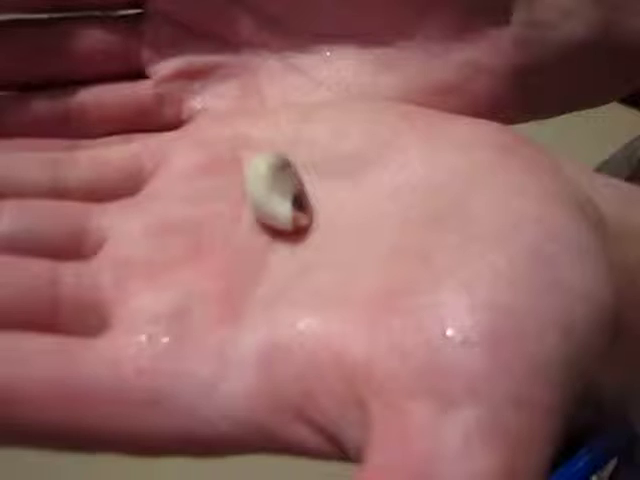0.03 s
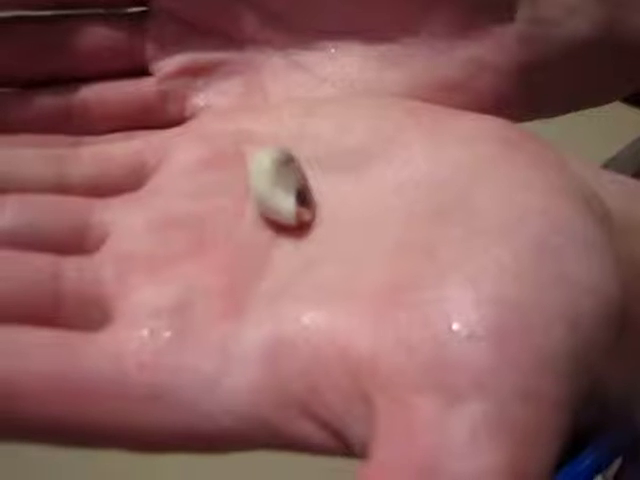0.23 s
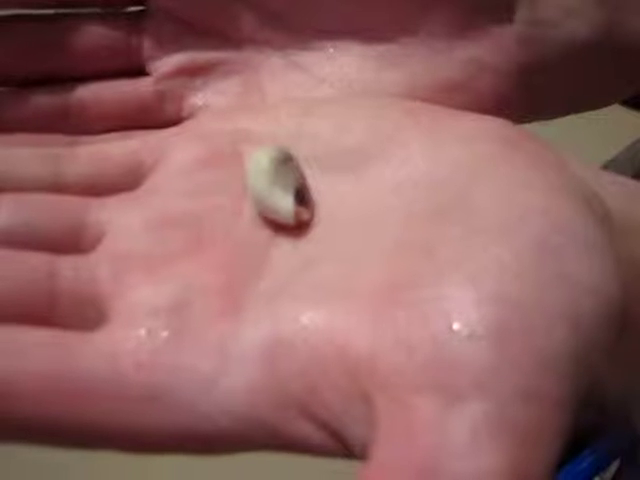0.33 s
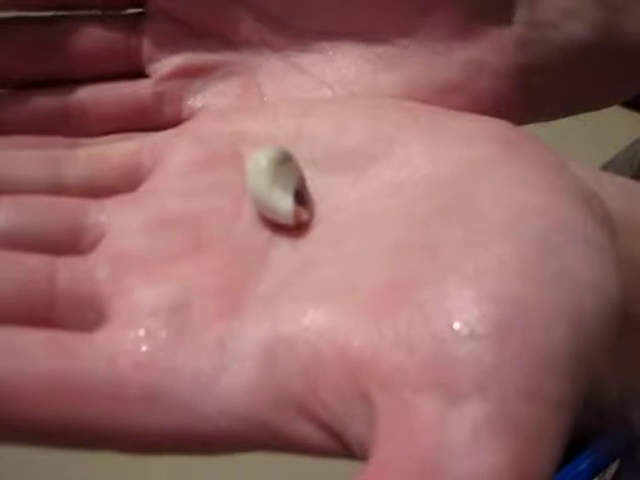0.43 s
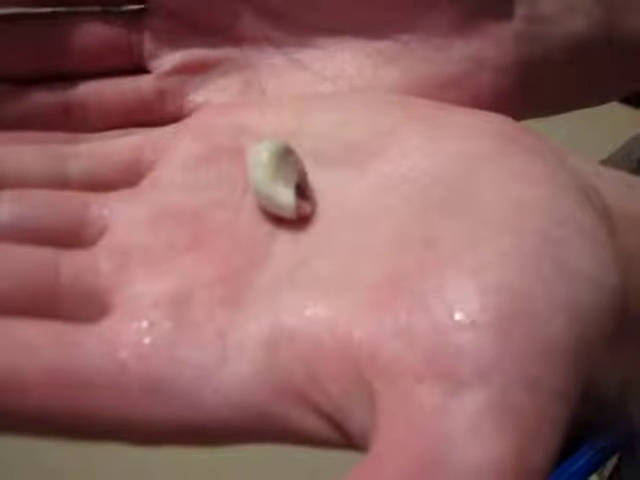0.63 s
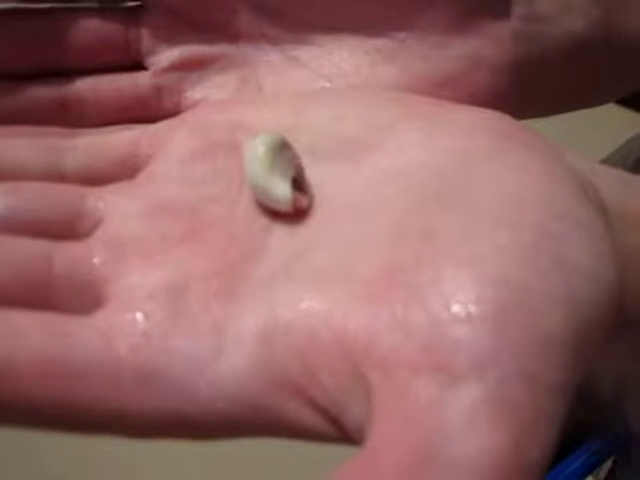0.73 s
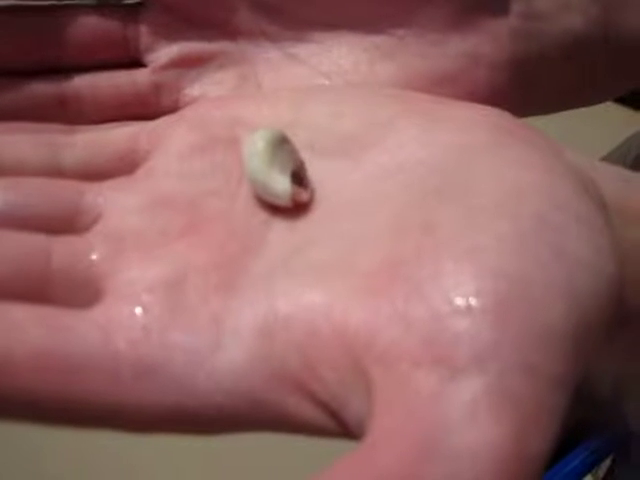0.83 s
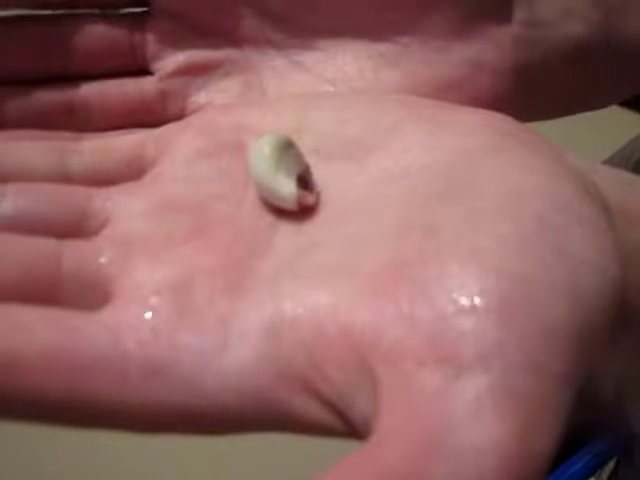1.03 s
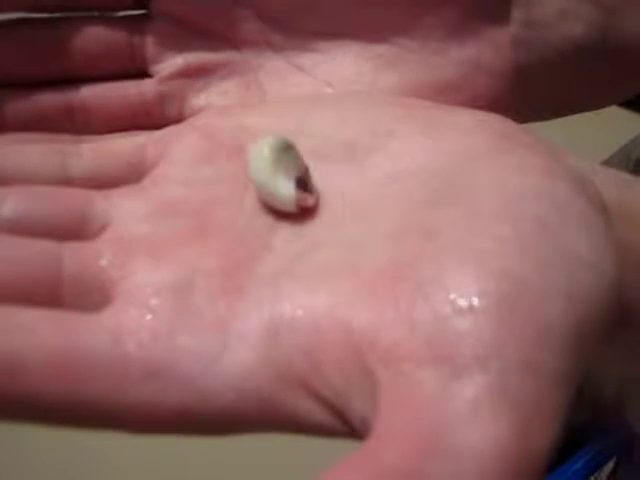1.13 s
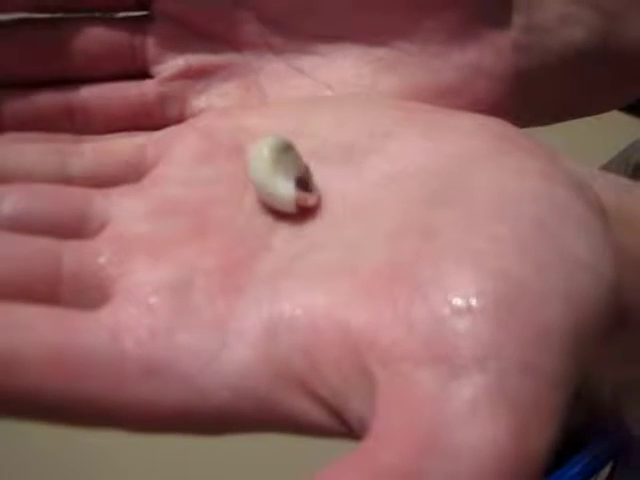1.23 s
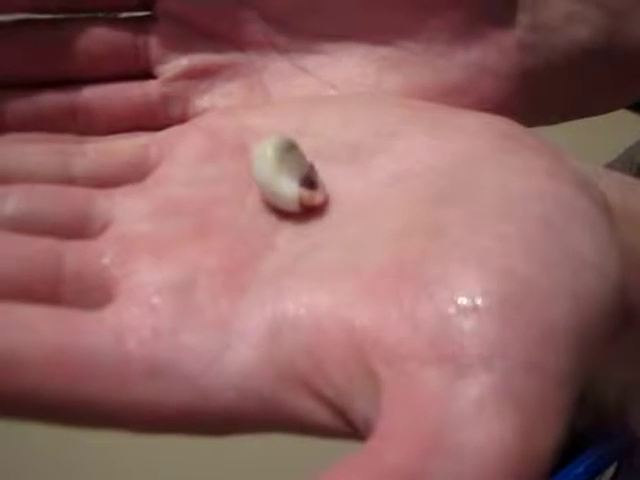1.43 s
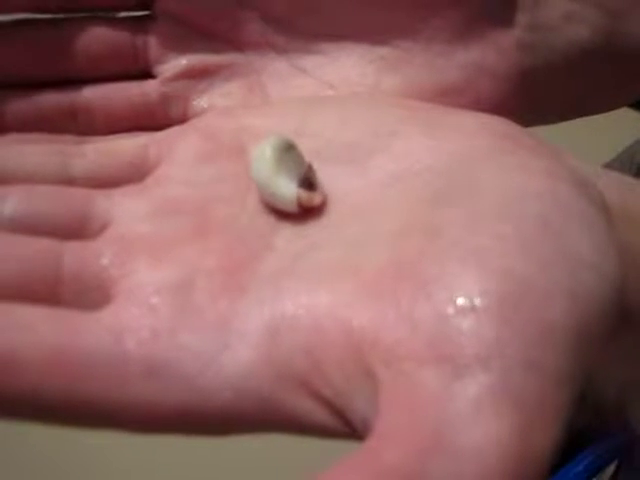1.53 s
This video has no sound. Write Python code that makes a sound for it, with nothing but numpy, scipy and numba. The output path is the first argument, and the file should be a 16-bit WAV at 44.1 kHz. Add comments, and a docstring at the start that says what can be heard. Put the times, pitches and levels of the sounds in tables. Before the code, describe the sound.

Dull, even air noise like distant wind, then a small click and a microphone bump.

```python
"""A steady, dull rush of air, like far wind or surf, heard through a small hand-held camera.
Late on, handling gives a light, bright click, then a hollow knock on the case that sets loose
parts buzzing. The camera's gain control ducks the rush for a moment after the knock.
Far underneath, its electronics whine faintly."""
import sys
import numpy as np
from scipy import signal
from scipy.fft import rfft, irfft
from scipy.io import wavfile
from scipy.ndimage import uniform_filter1d
from numba import njit

SR = 44100
rng = np.random.default_rng(int(sys.argv[2]) if len(sys.argv) > 2 else 0)


def inscribe(sig):
    """Save sig as 16-bit PCM at rate SR to the path in sys.argv[1].

    A 1-D sig is mono; a 2-D sig holds one channel per row.
    Samples are clipped to [-1, 1] before scaling.
    """
    pcm = np.round(np.clip(np.atleast_2d(sig).T, -1, 1) * 32767)
    wavfile.write(sys.argv[1], SR, pcm.astype(np.int16))


N = 70560

# The colour of the rush. Each row: frequency in Hz, relative spectral level in dB.
RUSH_SPECTRUM = [(20, -11), (45, -15), (110, -13.3), (200, -6.3), (290, -2.7), (390, -3.5), (530, .4),
                 (700, -2.2), (950, -5.6), (1250, -1.8), (1750, -9), (2120, -6), (2600, -11.3), (3300, -11),
                 (4200, -16), (5200, -15.8), (5800, -21.3), (6300, -30), (7200, -28.5), (8600, -25.8),
                 (11000, -29.8), (14000, -39.2), (16000, -42)]
# The fader ride on the whole rush. Each row: time in seconds, level in dB.
RUSH_FADER = [(.04, -34.6), (.12, -33.4), (.25, -34.5), (.5, -34.5), (.68, -33.7), (.8, -34.5),
              (.92, -34.9), (1.03, -34.1), (1.12, -35.6), (1.28, -36.3), (1.42, -36.5), (1.6, -37.1)]
# Swells in its low end. Each row: time in seconds, boost or cut in dB.
LOW_SWELLS = [(.05, -1.5), (.3, -1.5), (.58, .3), (.67, 2.4), (.74, -.7), (1.0, .2), (1.15, 0), (1.6, 1.1)]


def rush(t):
    """Broad air noise whose low end swells and flutters while the hiss stays nearly even."""
    crossover_hz, flutter_hz, shimmer_hz, wobble_db = 700, 28, 14, .43
    air = noise(RUSH_SPECTRUM)
    low = signal.sosfiltfilt(signal.butter(2, crossover_hz, fs=SR, output="sos"), air)
    hiss = air - low
    low_db = np.interp(t, *np.array(LOW_SWELLS).T) + wobble_db * walk(flutter_hz)
    hiss_db = wobble_db * walk(shimmer_hz)
    fader_db = np.interp(t, *np.array(RUSH_FADER).T)
    return (low * undb(low_db) + hiss * undb(hiss_db)) * undb(fader_db)


# The ring of the case. Each row: frequency in Hz, relative level in dB, seconds to fall 60 dB.
CASE_MODES = [(168, -10.5, .001), (490, -24, .11), (620, -14.5, .028), (864, -26, .1), (924, 4, .0048),
              (1169, -21.5, .1), (1183, -3.4, .017), (1322, -12.3, .03), (2207, -7, .0065),
              (3222, -18, .0098), (3854, -14.9, .0098), (5267, -23.5, .0096), (8614, -26, .0039),
              (10743, -31, .003), (13500, -38, .002)]
KNOCK_START_S, KNOCK_CONTACT_S = 1.326, .00193


def knock(t):
    """A handling bump makes the case ring, hollow in the mids."""
    return tap(t, CASE_MODES, KNOCK_START_S, level_db=-7, contact_s=KNOCK_CONTACT_S, build_cycles=.15)


# The click's ring. Each row: frequency in Hz, relative level in dB, seconds to fall 60 dB.
BRIGHT_MODES = [(2530, -10, .0099), (2798, -8.3, .0047), (4059, .4, .0044), (4489, -11.4, .0057),
                (5318, -7.7, .0079), (7148, -6.6, .0012), (8531, -5.7, .0034), (10031, -2.3, .0005),
                (12702, -14.5, .0014), (14654, -23.8, .0011)]


def click(t):
    """A light, very short contact excites high modes that die almost at once."""
    return tap(t, BRIGHT_MODES, start_s=1.12894, level_db=-12, contact_s=.00009, build_cycles=1.73)


# The mid-heavy colour of the buzz. Each row: frequency in Hz, relative spectral level in dB.
BUZZ_SPECTRUM = [(150, -25), (450, 0), (900, -2), (1350, 0), (1900, -16), (4000, -24), (8000, -50)]


def buzz(t, level_db=-25, t60_s=.07):
    """Loose parts shaken by the knock give it a short, rough tail."""
    since_knock = t - KNOCK_START_S - KNOCK_CONTACT_S
    decay = np.exp(-np.log(1000) * np.maximum(since_knock, 0) / t60_s)
    return undb(level_db) * noise(BUZZ_SPECTRUM) * (since_knock > 0) * decay


def whine(t, hz=12600, rms_db=-74):
    """The thin, steady tone of the camera's electronics."""
    return undb(rms_db) * np.sqrt(2) * np.sin(2 * np.pi * hz * t)


def tap(t, modes, start_s, level_db, contact_s, build_cycles):
    """Each mode swells over the contact plus its build-up cycles, treble first, then rings down."""
    ring = 0
    for hz, mode_db, t60 in modes:
        rise_s = contact_s + build_cycles / hz
        since_peak = t - start_s - rise_s
        swell = np.sin(np.pi / 2 * np.clip((t - start_s) / rise_s, 0, 1)) ** 2
        decay = np.exp(-np.log(1000) * np.maximum(since_peak, 0) / t60)
        ring -= undb(level_db + mode_db) * swell * decay * np.cos(2 * np.pi * hz * since_peak)
    return ring


def undb(db):
    """Decibels to gain."""
    return 10 ** (np.asarray(db) / 20)


def noise(points):
    """Noise of rms 1 with a spectrum of (Hz, dB) points."""
    hz, db = np.array(points).T
    bin_hz = np.maximum(np.arange(N // 2 + 1) * SR / N, 1)
    colour = undb(np.interp(np.log(bin_hz), np.log(hz), db))
    x = irfft(rfft(rng.standard_normal(N)) * colour, N)
    return x / x.std()


def walk(rate):
    """Random levels held 1 / rate seconds and slewed; spread 1."""
    hold = int(SR / rate)
    steps = rng.standard_normal(N)[np.arange(N) // hold]
    slewed = uniform_filter1d(uniform_filter1d(steps, hold), hold // 2)
    return slewed / slewed.std()


@njit
def follow(x, attack, release):
    """Level follower that rises fast and falls slowly."""
    out, level = np.empty(len(x)), 0.
    for i in range(len(x)):
        rectified = abs(x[i])
        level += (rectified - level) * (attack if rectified > level else release)
        out[i] = level
    return out


def gain_control(x, t):
    """The camera's compressor reacts slightly late, ducking everything just after a loud hit."""
    threshold_db, ratio = -25, 2.3
    attack_s, release_s, lag_s = .004, .018, .003
    envelope = follow(x, 1 / (attack_s * SR), 1 / (release_s * SR))
    late_envelope = np.interp(t - lag_s, t, envelope)
    overshoot = np.maximum(late_envelope / undb(threshold_db), 1)
    return x * overshoot ** (1 / ratio - 1)


def scene():
    """The bed of air, handling sounds on top and the whine beneath, in mono."""
    t = np.arange(N) / SR
    return (rush(t) + knock(t) + click(t) + buzz(t) + whine(t))[None]


def record(dry):
    """The camera's chain: gain control, soft clip, treble notch, abrupt cut-in and steep high cut."""
    ceiling_db, cut_in_s = -1.5, .036
    notch_hz, notch_width_hz, high_cut_hz = 6350, 1100, 15800
    t = np.arange(N) / SR
    x = gain_control(dry[0], t)
    x = undb(ceiling_db) * np.tanh(x / undb(ceiling_db))
    x = signal.lfilter(*signal.iirnotch(notch_hz, notch_hz / notch_width_hz, fs=SR), x)
    x = x * (t >= cut_in_s)
    return signal.sosfilt(signal.ellip(10, .1, 70, high_cut_hz, fs=SR, output="sos"), x)[None]


dry = scene()
out = record(dry)
inscribe(out)
```